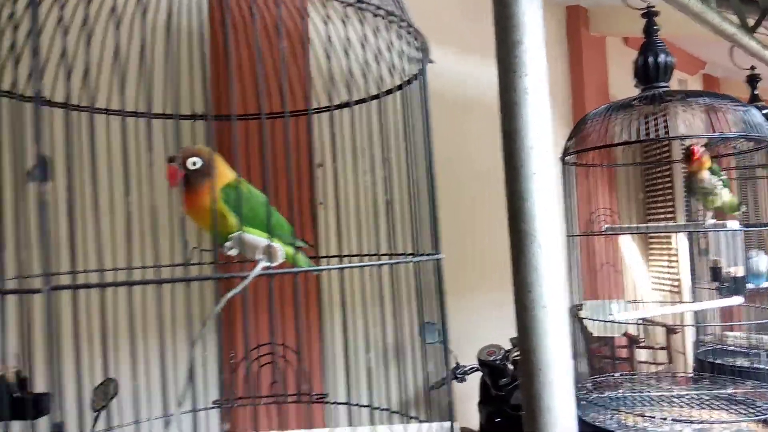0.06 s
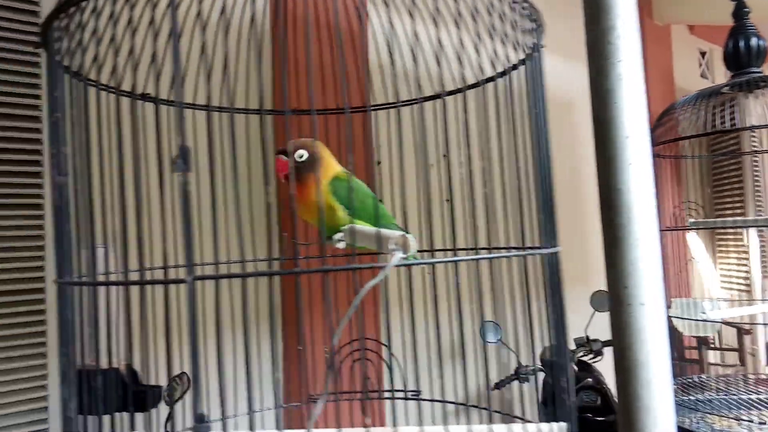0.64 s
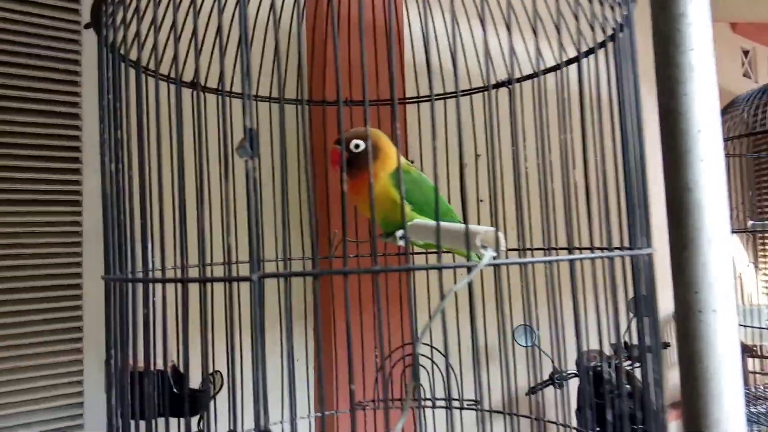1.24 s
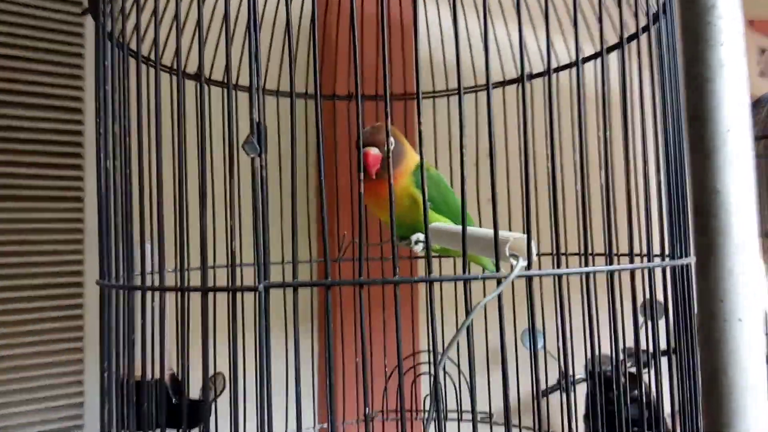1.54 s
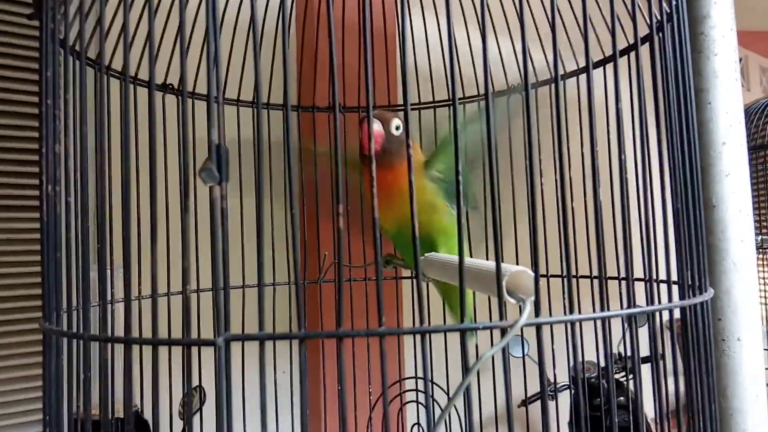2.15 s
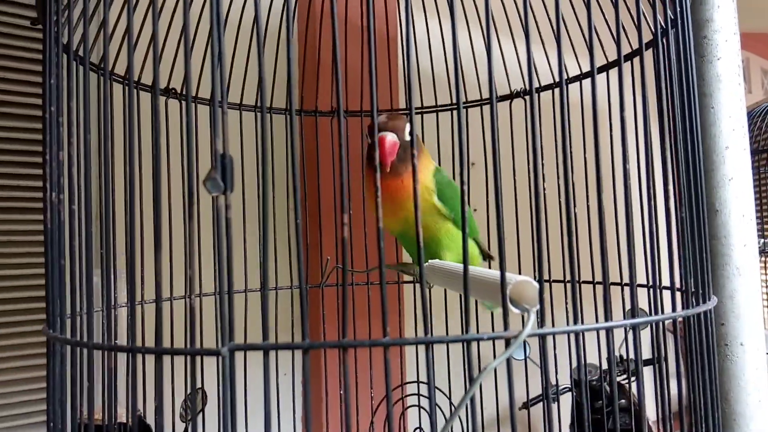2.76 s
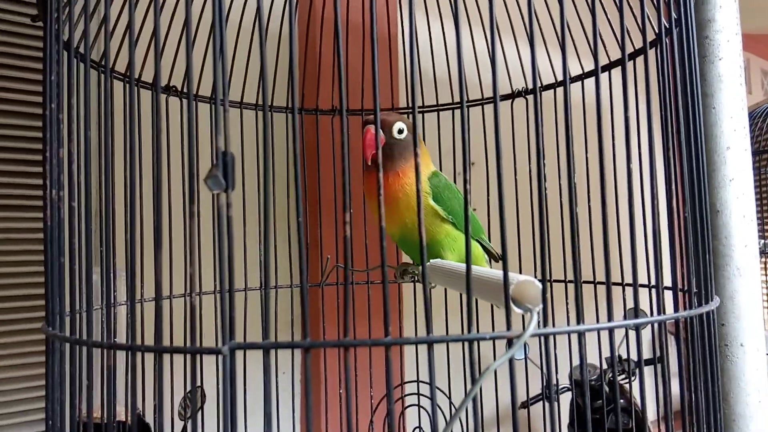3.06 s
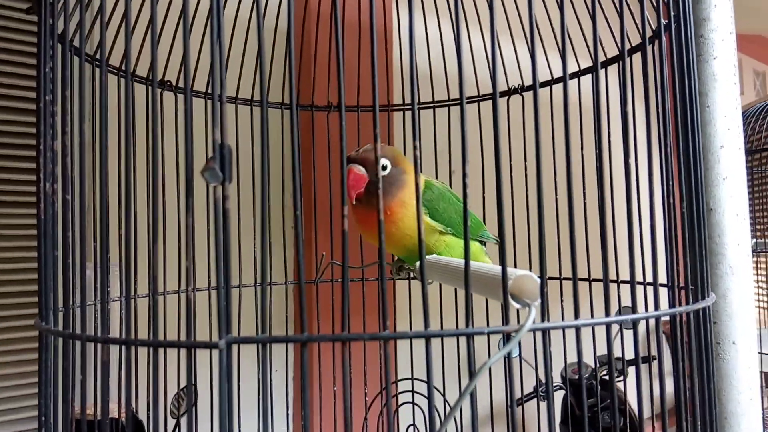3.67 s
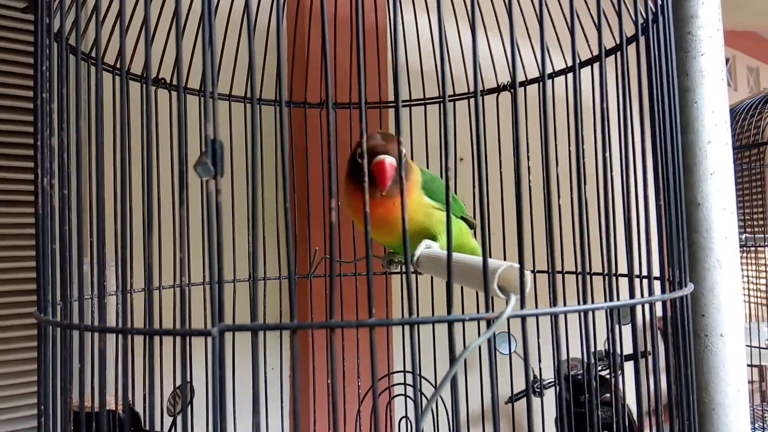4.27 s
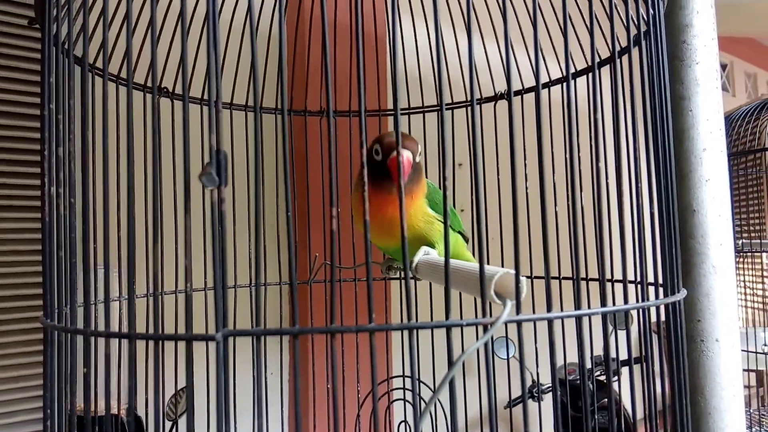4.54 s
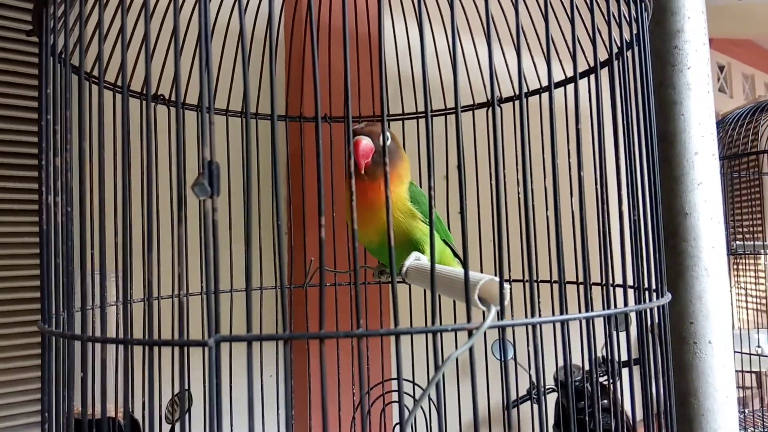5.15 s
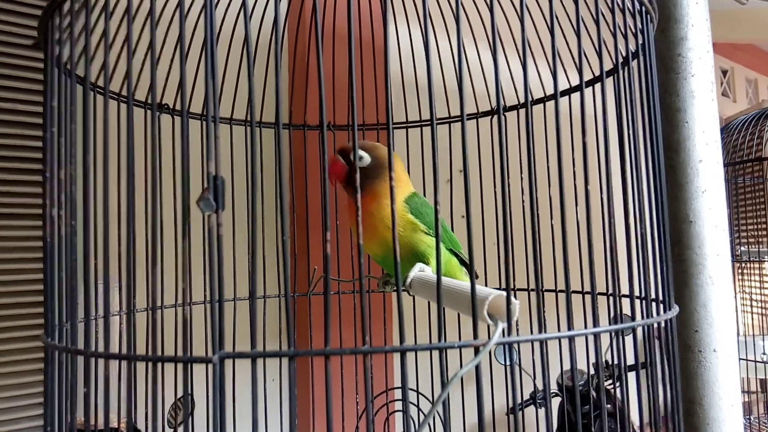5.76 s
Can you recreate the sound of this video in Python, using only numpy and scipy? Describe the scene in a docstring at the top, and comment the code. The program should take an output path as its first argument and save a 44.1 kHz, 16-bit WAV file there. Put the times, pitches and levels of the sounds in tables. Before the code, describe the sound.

Heard in mono from a porch, a low engine drone and distant traffic run throughout. A small caged parrot swishes its feathers and lets out a brief, sharp, high shriek that echoes slightly off the walls. The engine eases off and gradually fades, leaving traffic with faint whines. After some faint chirps and another wing swish, the bird gives a second, longer shriek with a rasping trill. Both calls are much louder than the street.

```python
"""Down the street a motorbike's exhaust pulses drone over a wash of traffic, low hums and faint whines.
On a porch a caged lovebird flutters and ticks on its perch. At 2.15 s its syrinx gives a short shriek;
the walls ring, as after each call, and the engine drops its revs to a lower boom. Faint chirps follow,
and at 5.74 s a longer shriek breaks into a harsh trill, a fast modulation of pitch and level.
The mono recorder's limiter ducks the street under each shriek."""
import sys
import numpy as np
from scipy import signal
from scipy.fft import rfft, irfft, next_fast_len
from scipy.io import wavfile
from scipy.ndimage import uniform_filter1d, minimum_filter1d

SR = 44100
rng = np.random.default_rng(int(sys.argv[2]) if len(sys.argv) > 2 else 0)


def unload_wav(signal):
    """Save mono or channel-first audio to the path in sys.argv[1] as 16-bit WAV at rate SR, clipped to [-1, 1]."""
    wavfile.write(
        sys.argv[1],
        SR,
        np.round(np.clip(np.atleast_2d(signal).T, -1, 1) * 32767).astype(np.int16),
    )


N = 265041
TIME = np.arange(N) / SR


def from_db(db):
    """Amplitude ratio of a level in decibels."""
    return 10 ** (np.asarray(db) / 20)


def unit_rms(x):
    """Normalisation to unit power."""
    return x / np.sqrt(np.mean(x ** 2) + 1e-20)


def in_time(rows, t=TIME):
    """Linear interpolation in time of each column after the first."""
    times, *columns = np.transpose(sorted(map(tuple, rows)))
    return [np.interp(t, times, column) for column in columns]


def at_hz(points, hz):
    """Interpolation on a logarithmic frequency axis."""
    known_hz, values = np.transpose(points)
    return np.interp(np.log(np.maximum(hz, 1)), np.log(known_hz), values)


def drift(rate_hz, size=N):
    """Low-pass noise of unit power: a smooth random fluctuation."""
    padded = next_fast_len(size)
    hz = np.fft.rfftfreq(padded, 1 / SR)
    spectrum = rfft(rng.standard_normal(padded)) / (1 + (hz / rate_hz) ** 2) ** 2
    return unit_rms(irfft(spectrum, padded)[:size])


def coloured_noise(spectrum, size=N):
    """Spectral shaping of white noise, at unit power."""
    gain = from_db(at_hz(spectrum, np.fft.rfftfreq(size, 1 / SR)))
    return unit_rms(irfft(rfft(rng.standard_normal(size)) * gain, size))


def band(x, low_hz, high_hz):
    """Butterworth band-pass filter."""
    return signal.sosfilt(signal.butter(2, [low_hz, min(high_hz, .45 * SR)], "band", fs=SR, output="sos"), x)


def narrowband_noise(rows):
    """Noise in narrow bands, each heard as a wavering tone."""
    return sum(from_db(db) * unit_rms(band(rng.standard_normal(N), hz - width / 2, hz + width / 2))
               for hz, width, db in rows)


def swells(rows):
    """An envelope of Gaussian pulses."""
    return sum(from_db(db) * np.exp(-.5 * ((TIME - centre) / width) ** 2) for centre, db, width in rows)


def during(start_s, length_s):
    """Sample times of an event, and its progress from 0 to 1."""
    t = TIME[(TIME >= start_s) & (TIME <= start_s + length_s)]
    return t, (t - start_s) / length_s


# Engine fundamental: (time [s], firing rate [Hz])
FIRING_RATE = [(0, 50.3), (1.0, 48.2), (2.1, 46.8), (2.3, 45.5), (2.5, 42.5), (2.8, 40.6), (4.0, 38.9),
               (6.0, 39.5)]
# Exhaust envelope, pulling and coasting: (time [s], level [dB])
PULLING_LEVEL = [(0.0, -38.5), (0.08, -30), (0.17, -41), (0.21, -30), (0.58, -32.5), (0.91, -28),
                 (1.06, -36.5), (1.27, -31), (1.32, -34.5), (2.1, -38.5)]
COASTING_LEVEL = [(2.3, -32), (2.34, -32.5), (3.02, -40), (3.1, -35.5), (3.79, -42), (3.93, -39),
                  (5.25, -48), (5.43, -42), (5.53, -66), (5.6, -43.5)]
# Exhaust resonances in each state: (frequency [Hz], gain [dB])
PULLING_RESPONSE = [(145, -16.5), (195, -11), (233, -9.5), (241, 2.5), (246, -12), (251, -6.5), (283, -7),
                    (287, -13), (296, -5), (303, -16.5)]
COASTING_RESPONSE = [(118, -6), (128, -2), (142, -4.5), (156, -2), (168, -11.5), (197, -9.5), (212, -6),
                     (235, -11.5), (250, -14), (275, -8.5)]
# Throttle, as the strength of the exhaust's rasp: (time [s], level [dB])
THROTTLE_LEVEL = [(0, -51.5), (0.5, -53), (0.7, -46), (1.0, -46.5), (1.35, -56.5), (1.75, -54.5),
                  (2.1, -59), (2.4, -65), (6, -61)]
# Upper partials at full throttle: (harmonic number, level relative to the rasp [dB])
RASP_HARMONICS = [(7, -16), (8, -15), (9, -6.5), (10, -1.5), (11, -6.5), (12, -8.5), (13, -10.5), (15, -10),
                  (16, -5), (17, -6)]
# Higher partials sink faster as the throttle eases: (harmonic number, sensitivity [dB/dB])
RASP_SENSITIVITY = [(10, 0.7), (17, 1.5)]


def motorbike(shut_at_s=2.27, shutting_s=.25, wobble=.0019, fading_db=2.2, rasp_fading_db=3.5):
    """Periodic firing makes harmonics that glide through exhaust resonances and fade independently."""
    rate = in_time(FIRING_RATE)[0]
    phase = 2 * np.pi * np.cumsum(rate * (1 + wobble * drift(8.4))) / SR
    shut = np.clip(.5 + (TIME - shut_at_s) / shutting_s, 0, 1)
    pull = (1 - shut) * from_db(in_time(PULLING_LEVEL)[0] + 1.5)
    coast = shut * from_db(in_time(COASTING_LEVEL)[0] + 1)
    drone = 0
    for k in range(3, 7):
        gain = pull * from_db(at_hz(PULLING_RESPONSE, k * rate))
        gain += coast * from_db(at_hz(COASTING_RESPONSE, k * rate))
        gain *= from_db(fading_db * drift(9.8))
        drone += gain * np.cos(k * phase + rng.uniform(0, 2 * np.pi))
    rasp_db = in_time(THROTTLE_LEVEL)[0]
    for k, db in RASP_HARMONICS:
        eased_db = rasp_db.max() + at_hz(RASP_SENSITIVITY, k) * (rasp_db - rasp_db.max())
        gain = from_db(eased_db + db + rasp_fading_db * drift(4))
        drone += gain * np.cos(k * phase + .9 * drift(6))
    pulsed_noise = rng.standard_normal(N) * (1 + .16 * np.cos(phase))
    burble = from_db(-8) * coast * unit_rms(band(pulsed_noise, 82, 222))
    return np.sqrt(2) * drone + burble


# Spectrum of the traffic wash: (frequency [Hz], relative level [dB])
TRAFFIC_SPECTRUM = [(18, -36), (32, -19.5), (66, -10.5), (87, -4.5), (185, -3.5), (247, -4.5), (460, -16),
                    (1000, -21.5), (1140, -24.5), (2190, -26), (2630, -29), (6200, -36.5), (8040, -48.5),
                    (9390, -45.5), (12200, -56.5), (15000, -74)]
# Rush of nearing vehicles, and the top treble, each in two spans: (time [s], relative level [dB])
RUSH_LEVEL = [
    [(0.0, -56.5), (0.98, -57), (1.34, -57), (1.72, -61.5), (2.1, -64)],
    [(2.85, -60.5), (3.18, -62), (4.37, -56.5), (4.99, -57), (5.7, -55)],
]
TREBLE_LEVEL = [
    [(0.0, -69), (0.48, -70.5), (0.82, -76.5), (1.89, -77), (2.1, -72)],
    [(2.75, -69.5), (3.12, -83), (3.87, -77.5), (3.98, -76), (5.7, -69.5)],
]
# How the wash follows each curve: (frequency [Hz], rush [dB/dB], throttle [dB/dB], treble [dB/dB])
WASH_SENSITIVITY = [(110, .03, 0.24, 0.02), (500, 0.14, 0.29, 0.11), (2000, 0.76, 0, 0),
                    (5500, 0.76, 0.2, 0.2), (9000, .03, 0.02, 0.84)]


def traffic(level_db=-41, dull_hz=11000):
    """Broadband noise swells with nearness and throttle; absorption over distance removes the top."""
    hz = np.fft.rfftfreq(N, 1 / SR)
    spectrum = rfft(coloured_noise(TRAFFIC_SPECTRUM)) / np.sqrt(1 + (hz / dull_hz) ** 8)
    curves = np.vstack(RUSH_LEVEL), THROTTLE_LEVEL, np.vstack(TREBLE_LEVEL)
    levels_db = np.array([in_time(curve)[0] for curve in curves])
    swings_db = levels_db - levels_db.mean(axis=1, keepdims=True)
    bands = np.array(WASH_SENSITIVITY)
    wash = 0
    for weights, sensitivity in zip(np.eye(len(bands)), bands[:, 1:]):
        crossover = at_hz(list(zip(bands[:, 0], weights)), hz)
        wash += irfft(spectrum * crossover, N) * from_db(sensitivity @ swings_db)
    return from_db(level_db) * wash


# Steady hums under the traffic: (frequency [Hz], bandwidth [Hz], level [dB])
HUM_BANDS = [(54.9, 9.8, -60.5), (94.4, 13.5, -50.5)]
# Brief swells of the bass: (time [s], level [dB], Gaussian width [s])
BASS_SWELLS = [(.06, -40.5, 0.091), (5.98, -37.5, 0.037)]


def rumble():
    """Band-limited bass noise: two narrow bands hum and a wider one swells briefly."""
    hum = narrowband_noise(HUM_BANDS)
    bass = unit_rms(band(rng.standard_normal(N + SR), 70, 132)[SR:])   # the filter settles for 1 s
    return hum + swells(BASS_SWELLS) * bass


# Whines in the traffic: (frequency [Hz], bandwidth [Hz], level at 5.5 s [dB])
WHINE_BANDS = [(1552, 52, -61.5), (2380, 49, -65.5), (6300, 500, -67)]


def whines(rise_db_per_s=3.0):
    """Narrowband noise grows louder as its sources slowly approach."""
    return narrowband_noise(WHINE_BANDS) * from_db(rise_db_per_s * (TIME - 5.5))


# Wing beats and rustles: (time [s], level [dB], Gaussian width [s])
WING_BEATS = [(0.096, -65, .012), (0.43, -72, .008), (1.862, -61.5, 0.014), (1.93, -57.5, 0.012),
              (1.986, -58, .013), (2.139, -56, 0.0067), (2.506, -64.5, 0.15), (4.855, -72, .01),
              (5.574, -51.5, 0.016)]
# Feather noise: (frequency [Hz], relative level [dB])
FEATHER_SPECTRUM = [(1500, 6), (4000, 0.5), (7000, 2), (11000, 0.5), (13000, -12.5), (16000, -7)]


def wings(flicker_db=2.0):
    """Amplitude-modulated noise: each beat is a soft swish of feathers."""
    return swells(WING_BEATS) * coloured_noise(FEATHER_SPECTRUM) * from_db(flicker_db * drift(300))


# Echoes from near walls and the cage tray: (delay [s], gain [dB])
EARLY_REFLECTIONS = [(.0004, -45), (.0088, -13.5), (0.018, -20)]
# Reverberation time of the porch: (frequency [Hz], time to fall 60 dB [s])
REVERB_TIME = [(500, 0.63), (2500, 0.47), (4200, 0.73), (8000, 0.47), (14000, 0.28)]
# Colour of the reverberation: (frequency [Hz], relative level [dB])
REVERB_SPECTRUM = [(500, 7), (2500, 11), (3200, -3.5), (4300, -7), (6000, 1.5), (9000, 0), (14000, 8)]


def porch(x, wet_db=-13, build_s=.0033):
    """Reverberation: early reflections, then a diffuse field whose top treble dies first."""
    t = TIME[:SR]
    edges_hz = np.geomspace(500, 16000, 11)
    tail = 0
    for low, high in zip(edges_hz, edges_hz[1:]):
        hz = np.sqrt(low * high)
        level_db = at_hz(REVERB_SPECTRUM, hz) - 60 * t / at_hz(REVERB_TIME, hz)
        tail += band(rng.standard_normal(SR), low, high) * from_db(level_db)
    tail *= 1 - np.exp(-(t / build_s) ** 2)
    tail /= np.sqrt(np.sum(tail ** 2))
    early = sum(from_db(db) * np.interp(TIME - round(delay * SR) / SR, TIME, x)
                for delay, db in EARLY_REFLECTIONS)
    return x + early + from_db(wet_db) * signal.fftconvolve(x, tail)[:N]


# Beak and claws on the perch: (time [s], relative level [dB])
PERCH_CONTACTS = [(1.5519, -46.5), (4.0926, -36.5)]


def ticks(decay_s=.0099, gain_db=-17):
    """Each tiny impact excites treble noise that decays exponentially."""
    envelope = sum(from_db(db) * (TIME >= start) * np.exp(-np.abs(TIME - start) / decay_s)
                   for start, db in PERCH_CONTACTS)
    return from_db(gain_db) * envelope * unit_rms(band(rng.standard_normal(N), 6000, 10500))


# Resonances of the windpipe and open beak: (frequency [Hz], gain [dB])
VOCAL_TRACT = [(1700, -19), (2450, -18.5), (3300, -3), (4000, 0), (4800, 2), (5400, 2), (6400, -1),
               (7300, -3), (8400, -14), (9700, -5.5), (12200, -11), (14000, -22), (16000, -34.5)]


def syrinx(t, pitch, level_db, depth_hz, flutter, jitter, rasp_db, tilt_db, throb_db=2.4):
    """Source and filter: harmonics sweep through fixed resonances; flutter modulates pitch and level."""
    harshness = depth_hz / 700   # deeper flutter brings more jitter, shimmer and rasp
    unsteadiness = (jitter + .058 * harshness) * drift(1050, len(t))
    pitch = (pitch + depth_hz * flutter) * (1 + unsteadiness)
    phase = 2 * np.pi * np.cumsum(pitch) / SR
    voice, power = 0, 1e-12
    for k in range(1, 9):
        gain = from_db(at_hz(VOCAL_TRACT, k * pitch) + tilt_db * np.log2(k)) * (k * pitch < SR / 2)
        # unsteady membranes smear each harmonic, the upper ones most
        shimmer = 1 + min(.16 * k, .6) * (harshness + .25) * drift(900, len(t))
        voice += gain * shimmer * np.sin(k * phase + rng.uniform(0, 2 * np.pi))
        power += gain ** 2 / 2
    hiss = unit_rms(band(coloured_noise(VOCAL_TRACT, len(t)), 3900, 12000))
    rasp = from_db(rasp_db + 10.5 * harshness) * hiss
    ramps = np.clip(np.minimum(t - t[0], t[-1] - t) / .00037, 0, 1)
    envelope = ramps * from_db(level_db + throb_db * harshness * flutter)
    out = np.zeros(N)
    out[np.round(t * SR).astype(int)] = (voice / np.sqrt(power) + rasp) * envelope
    return out


FLUTTER_HZ = 217   # modulation rate of shrieks and chirps
# Notes of the shrieks: (time [s], duration [s], first pitch [Hz], last pitch [Hz], level [dB],
# flutter depth at onset [Hz], spectral tilt [dB/octave])
SHRIEK_NOTES = [(2.1520, .0074, 2800, 2480, -20.5, 0, -8), (2.1586, .0346, 3640, 4600, -9.5, 850, 0),
                (5.7402, .0105, 1680, 1800, -26.5, 0, -1.5), (5.7500, .0415, 2290, 2500, -17.5, 650, -3),
                (5.7908, .007, 3000, 2900, -18, 750, -2.5)]


def shrieks(gain_db=-1.8, attack_s=.002, crest_s=.0023, settle_s=.005, fade_share=.2):
    """Frequency glides that fade on their last pitch; most open with a damped flutter transient."""
    out = 0
    for start, length, first_hz, last_hz, db, depth_hz, tilt_db in SHRIEK_NOTES:
        t, progress = during(start, length)
        transient = np.exp(-(t - start) / settle_s) * (depth_hz > 0)
        flutter = np.cos(2 * np.pi * FLUTTER_HZ * (t - start - crest_s))
        accent_db = (1.5 + 4.5 * flutter) * transient
        attack_db = -8 * np.clip(1 - (t - start) / attack_s, 0, 1)
        fade_db = -12 * np.clip(1 - (1 - progress) / fade_share, 0, 1)
        level_db = gain_db + db + accent_db + attack_db + fade_db
        pitch = first_hz + (last_hz - first_hz) * np.minimum(progress / (1 - fade_share), 1)
        out += syrinx(t, pitch, level_db, depth_hz * transient, flutter,
                      jitter=.0098, rasp_db=-21, tilt_db=tilt_db)
    return out


# Faint calls of this bird and its neighbours: (time [s], duration [s], first pitch [Hz],
# last pitch [Hz], peak level [dB], flutter depth [Hz], spectral tilt [dB/octave])
FAINT_CHIRPS = [(2.997, 0.025, 4600, 5050, -51.5, 500, -18), (5.479, 0.041, 1413, 1702, -44, 110, -30),
                (5.535, 0.0196, 2930, 3200, -51, 30, -3), (5.548, 0.043, 2394, 1965, -46, 190, -34)]


def chirps(swell_db=14):
    """Linear frequency sweeps, blurred by jitter, swell and sink."""
    out = 0
    for start, length, first_hz, last_hz, db, depth_hz, tilt_db in FAINT_CHIRPS:
        t, progress = during(start, length)
        pitch = first_hz + (last_hz - first_hz) * progress
        flutter = np.cos(2 * np.pi * FLUTTER_HZ * (t - start))
        level_db = db - swell_db * np.abs(2 * progress - 1)
        out += syrinx(t, pitch, level_db, depth_hz, flutter, jitter=.018, rasp_db=-22, tilt_db=tilt_db)
    return out


# The trill that ends the long shriek: (time [s], centre pitch [Hz], level [dB])
TRILL_CONTOUR = [(5.797, 2750, -12), (5.808, 3400, -11), (5.814, 3250, -13), (5.832, 4300, -8.5),
                 (5.853, 4100, -9), (5.875, 3200, -9), (5.884, 3120, -8.5), (5.891, 4050, -8.5),
                 (5.909, 4050, -13)]
# Its flutter slows in the middle: (time [s], modulation rate [Hz])
TRILL_FLUTTER_RATE = [(5.847, 222), (5.851, 190), (5.868, 190), (5.873, 222), (5.887, 224), (5.891, 250)]
# Its flutter deepens as the pitch rises: (centre pitch [Hz], depth [Hz])
TRILL_FLUTTER_DEPTH = [(2600, 200), (3700, 700)]


def trill(gain_db=-1.8, crest_s=5.831, release_s=.0044):
    """Sustained frequency modulation spreads the harmonics into sidebands, heard as a harsh screech."""
    start, end = TRILL_CONTOUR[0][0], TRILL_CONTOUR[-1][0]
    t, _ = during(start, end - start)
    pitch, level_db = in_time(TRILL_CONTOUR, t)
    cycles = np.cumsum(in_time(TRILL_FLUTTER_RATE, t)[0]) / SR
    flutter = np.cos(2 * np.pi * (cycles - np.interp(crest_s, t, cycles)))
    depth_hz = at_hz(TRILL_FLUTTER_DEPTH, pitch)
    fade_db = -4 * np.clip(1 - (t[-1] - t) / release_s, 0, 1)
    return syrinx(t, pitch, gain_db + level_db + fade_db, depth_hz, flutter,
                  jitter=.012, rasp_db=-29, tilt_db=-1.9)


def scene():
    """Superposition of the birds, with the porch's ring, and the street, alike in both channels."""
    birds = shrieks() + trill() + chirps() + wings() + ticks()
    mono = porch(birds) + motorbike() + traffic() + rumble() + whines()
    return np.array([mono, mono])


def record(dry, limit_db=-19.5, release_db_per_s=210, low_cut_hz=30, high_cut_hz=15750):
    """Limiting: the gain drops at each loud peak, holds and recovers; filters cut deep bass and the top."""
    power = uniform_filter1d(dry[0] ** 2, size=80)
    excess_db = np.maximum(10 * np.log10(np.maximum(power, 1e-12)) - limit_db, 0)
    hold = 2 * int(.008 * SR) + 1   # 16 ms
    held_db = -minimum_filter1d(-excess_db, hold, origin=hold // 2)
    duck_db = np.maximum.accumulate(held_db + release_db_per_s * TIME) - release_db_per_s * TIME
    limited = dry * from_db(-uniform_filter1d(duck_db, size=64))
    high_pass = signal.butter(1, low_cut_hz, "high", fs=SR, output="sos")
    low_pass = signal.ellip(10, .1, 80, high_cut_hz, fs=SR, output="sos")
    return signal.sosfilt(low_pass, signal.sosfilt(high_pass, limited))


dry = scene()
out = record(dry)
unload_wav(out)
```